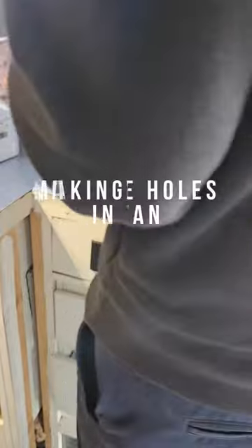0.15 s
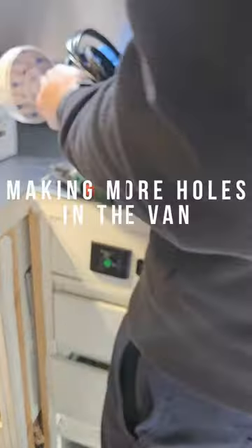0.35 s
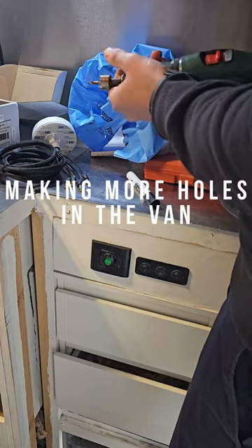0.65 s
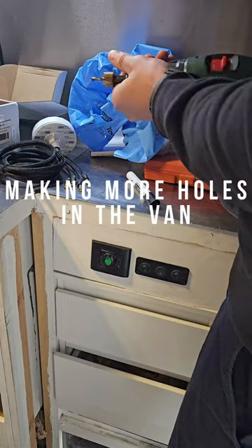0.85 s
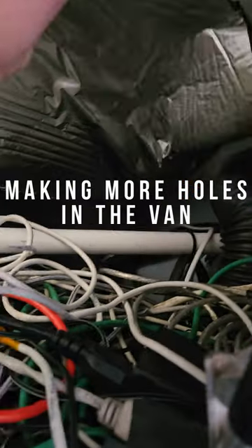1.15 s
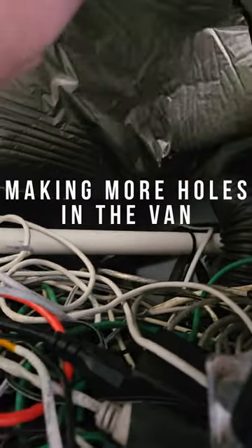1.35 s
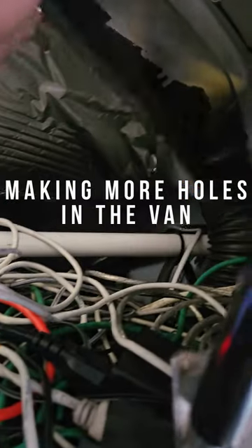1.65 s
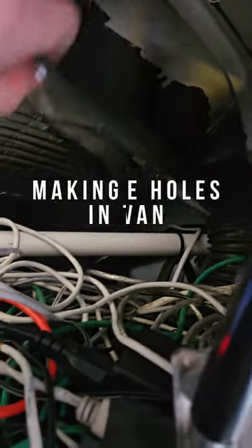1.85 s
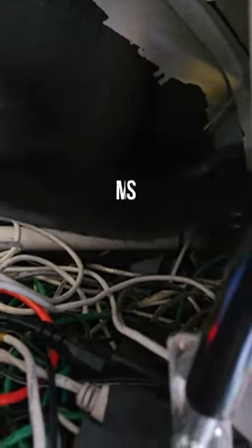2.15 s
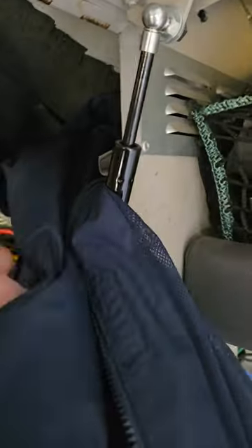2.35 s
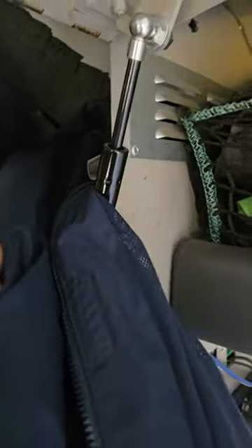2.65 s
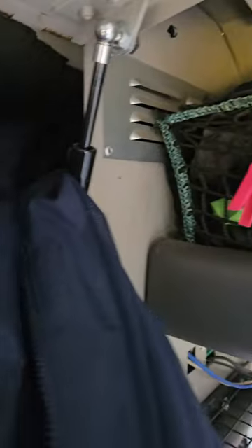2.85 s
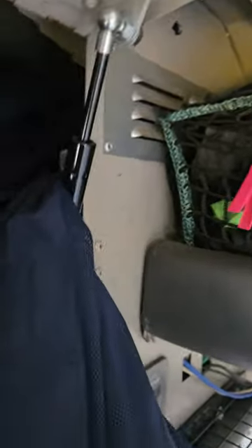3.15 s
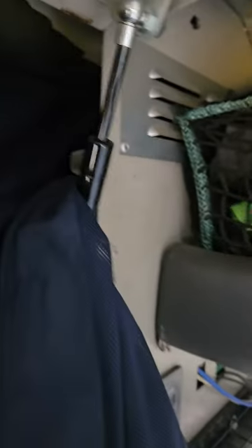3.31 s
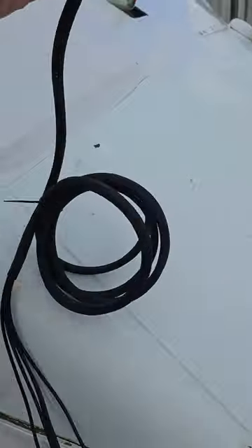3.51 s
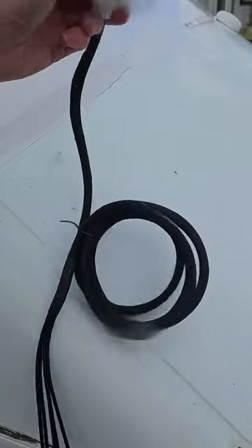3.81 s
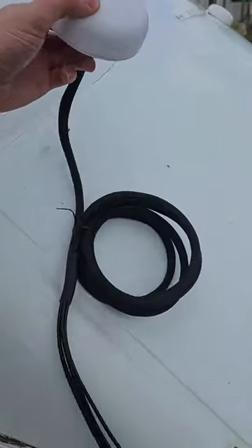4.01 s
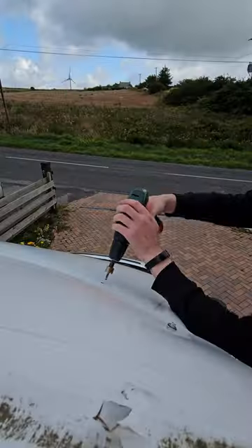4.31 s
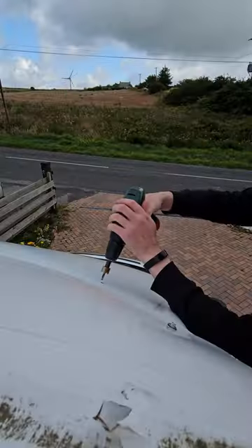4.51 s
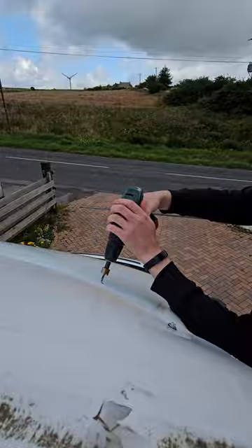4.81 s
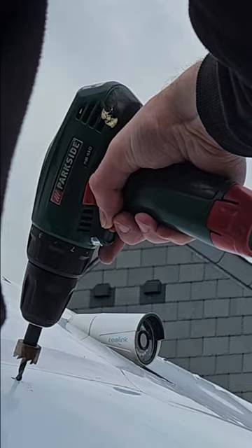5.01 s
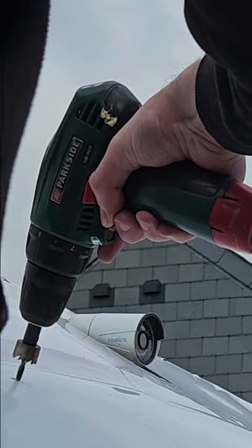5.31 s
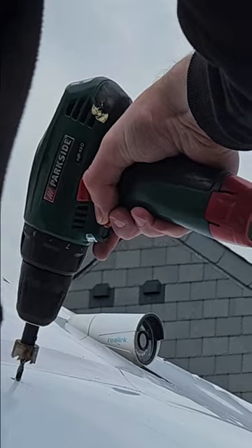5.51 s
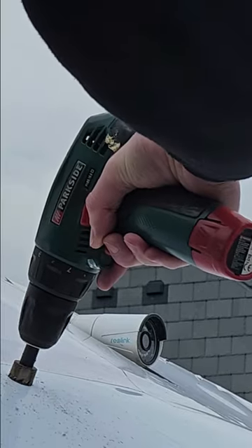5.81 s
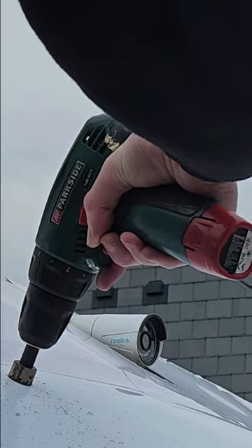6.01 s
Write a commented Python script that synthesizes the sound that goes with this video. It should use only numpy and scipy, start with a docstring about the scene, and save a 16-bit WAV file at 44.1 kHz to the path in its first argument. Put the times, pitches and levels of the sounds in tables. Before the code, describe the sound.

Close handling in a van: drill chirps, crisp plastic crunches, soft panel thumps and clicks, then a hole saw scrapes and rings a metal roof.

```python
"""Fitting a cable and drilling a van roof

Inside, motor noise, sparks and gear tones make two drill blips that close its chuck. Plastic sheeting
crackles in noise bursts, a jacket rubs past, and a cable clicks and bumps on ringing bodywork.
Outside, in light wind, the drill runs on its pilot bit until the hole saw bites into the metal roof:
grainy noise scrapes and rings the sheet. All is heard close to a hand-held phone with two ports."""
import sys
import numpy as np
from scipy import signal
from scipy.fft import rfft, irfft
from scipy.io import wavfile
from scipy.ndimage import uniform_filter1d

SR = 44100
rng = np.random.default_rng(int(sys.argv[2]) if len(sys.argv) > 2 else 0)


def wrap_up_sound(samples):
    """Save the sound to the file named by the first command line argument, as 16-bit audio."""
    columns = np.atleast_2d(samples).T
    # keep every value between -1 and 1, then stretch to whole-number steps
    tamed = np.clip(columns, -1, 1)
    steps = np.round(tamed * 32767).astype(np.int16)
    wavfile.write(sys.argv[1], SR, steps)


N = 271656
TIME = np.arange(N) / SR  # [s]

# Drill trigger presses (press [s], held [s], free shaft speed [Hz], braking [Hz per s],
# hum [dB] before it is scaled by speed)
TRIGGER = [(.6, .2, 270, 2200, -47), (0.905, .14, 320, 3100, -64)]
SPIN_UP_S = .055
BLIP_DB, BLIP_SPEED_POWER = -32, 1.8  # level at RUN_HZ; amplitude grows as this power of speed
RUN_FROM_S, RUN_HZ, RUN_DB = 5.03, 276.4, -47.5
# Gear tones of the blips (multiple of shaft speed, level [dB])
BLIP_GEARS = [(13, -6), (14, -10), (16, -15)]
# Motor whine on the roof (multiple of shaft speed, level [dB])
RUN_WHINE = [(2, -17), (18, -13), (21, -11), (27, -14), (29, -11), (31, -12), (49, -16)]
# Colour of the brush hiss and of the sparks (frequency [Hz], relative level [dB])
BRUSH_TONE = [(150, -21), (650, 0.5), (1400, -5), (3800, 0.5), (8000, -4), (16000, -14)]
SPARK_TONE = [(400, -10), (3000, -17), (5400, -5), (6600, -18), (8200, -6)]
# The housing booms when an overtone of the shaft sweeps through its resonance
HOUSING_HZ, HOUSING_WIDTH_HZ, HOUSING_DB = 570, 170, -47
# Gear case resonances, rung by chattering teeth (frequency [Hz], width [Hz], level [dB])
GEAR_CASE = [(1060, 3400, -1.5), (3220, 340, -2), (5300, 620, 0.5), (8200, 1400, -6.5)]
CHUCK_TURNS_PER_S, RATTLE_DB = 17, -46.5  # turns at RUN_HZ

# The saw bites: its load grows over LOAD_S and slows the shaft by SAG_HZ
BITE_S, LOAD_S, SAG_HZ = 5.652, 0.049, 22.44
SCRAPE_DB, SWARF_DB, SHAKE_DB = -34, -33, -24.5
EASE_DB_PER_S = 13.5  # swarf and shaking ease as the groove is cut
# Ringing of the roof and saw cup (frequency [Hz], width [Hz], level [dB])
SHEET_RINGS = [(1235, 27, -2.5), (2050, 110, -2.5), (2770, 150, 1.5), (3390, 130, 9), (3800, 480, 7),
               (6130, 130, 0.5)]
# Colour of the scrape and of the torn swarf (frequency [Hz], relative level [dB])
SCRAPE_TONE = [(450, 6), (900, 0), (3600, -6.5), (9000, -12.5), (16000, -7)]
SWARF_TONE = [(5000, -20), (11000, -20), (14400, 2)]

# Squeezes of plastic sheeting (full at [s], attack [s], hold [s], level [dB])
SQUEEZES = [(1.17, 0.036, 0.048, -42.5), (1.38, 0.089, 0.024, -25), (1.5, 0.1, 0.022, -33),
            (1.86, 0.47, 0.12, -23), (2.06, 0.23, 0.073, -21), (2.21, 0.099, 0.083, -26.5)]
SQUEEZE_RELEASE_S = 0.06
# Short crunches: handled drill first, then plastic sheeting and fabric (time [s], level [dB])
CRUNCHES = [(0.422, -33), (0.459, -39), (1.239, -20.5), (1.374, -16), (1.459, -25.5), (1.501, -26),
            (1.543, -23.5), (1.624, -33.5), (1.778, -22.5), (1.798, -23), (1.823, -15.5), (1.882, -17.5),
            (1.906, -19), (1.944, -18), (1.962, -19), (2.002, -15), (2.043, -19), (2.055, -16.5),
            (2.07, -14.5), (2.096, -17.5), (2.201, -19.5), (2.229, -17), (2.254, -18), (2.31, -13),
            (2.948, -27), (3.115, -24.5), (3.163, -29.5)]
CRUNCH_T60_S, CRACK_T60_S, CRACK_DB = .04, 0.014, -4  # T60: time to fall by 60 dB
# Each crunch rings at its own pitch, scattered about a centre
RING_HZ, RING_SPREAD_OCTAVES, RING_Q, RING_DB = 3800, .9, 3.5, 4
# Colour of the crackles and crunches (frequency [Hz], relative level [dB])
PLASTIC_TONE = [(60, -6.5), (160, 4.5), (550, 6.5), (1250, 1.5), (1480, 6), (2350, 1.5), (4700, 5.5),
                (6500, -0.5), (16000, -3.5)]

# Cable and hard plastic clicks (time [s], body level [dB], treble relative to body [dB] before a
# common treble boost)
CLICKS = [(1.875, -15.5, 2.5), (3.54, -38, 3), (3.576, -43, 16), (3.624, -28.5, 2.5), (3.641, -48, 21.5),
          (3.75, -34, -19), (3.985, -18.5, -3), (3.998, -29, -20), (4.092, -47, 4.5)]
# Colour of a click's body and of its treble (frequency [Hz], relative level [dB])
SNAP_TONE = [(300, -19), (2150, 1), (3400, 4.5), (8000, -2), (16000, -18)]
SNAP_TREBLE_TONE = [(4000, -14.5), (11500, 3)]
# Bumps on the van's panels (time [s], level [dB], centre pitch [Hz])
BUMPS = [(1.241, -19.5, 235), (1.374, -17, 226), (1.424, -19.5, 197), (1.436, -19, 187),
         (1.453, -19.5, 141), (1.548, -18.5, 134), (1.965, -17.5, 164), (2.096, -15, 138),
         (2.914, -12.5, 110), (2.946, -16.5, 142), (3.005, -22, 150), (3.152, -18.5, 138),
         (4.83, -23.5, 75), (3.792, -21, 236), (3.852, -20.5, 125)]
# Panel ringing (multiple of centre pitch, level [dB], time to fall 60 dB [s])
PANEL_MODES = [(.62, -8, .14), (1, -1, .075), (1.5, -4, .05)]
# Knocks of chuck, cable and fittings (time [s], level [dB], ring [Hz], time to fall 60 dB [s])
KNOCKS = [(.581, -38.5, 748, 0.05), (0.804, -30.5, 711, 0.05), (1.242, -23, 564, 0.024),
          (1.379, -23, 596, .06), (1.549, -24.5, 870, 0.027), (1.967, -20.5, 840, 0.059),
          (2.071, -13.5, 557, 0.028), (2.098, -19, 520, 0.032), (2.857, -23, 475, 0.0095),
          (2.918, -22.5, 305, 0.081), (3.003, -26.5, 710, 0.1), (3.424, -31, 730, 0.1),
          (3.79, -27, 605, .016), (3.869, -31.5, 380, 0.027), (4.242, -42.5, 3400, 0.034),
          (4.899, -40.5, 2440, 0.03)]
# Ringing of a knocked fitting (multiple of ring pitch, level [dB])
FITTING_MODES = [(1, 0), (1.6, -13), (2.9, -12.5)]
SCUFF_DB, SCUFF_T60_S = -3, 0.03

# Jacket slides (full at [s], hold [s], swish [dB], dull rub [dB]), both before the closeness boost
SLIDES = [(2.304, 1.119, -49.5, -43.5), (3.515, 0.78, -69, -51)]
SLIDE_ATTACK_S, SLIDE_RELEASE_S = 0.2, 0.46
# The jacket comes close to the phone once, then draws away
CLOSEST_S, APPROACH_S, RECEDE_S = 2.919, 0.26, 0.38
CLOSE_SWISH_DB, CLOSE_RUB_DB = 19.5, 13.5
# Brushes of a sleeve near the phone (full at [s], hold [s], level [dB])
BRUSHES = [(0, 0.093, -46.5), (0.046, 0.0047, -30), (0.114, 0.01, -29)]
BRUSH_ATTACK_S, BRUSH_RELEASE_S = 0.021, 0.088
# Colour of the cloth's swish and of its rub (frequency [Hz], relative level [dB])
SWISH_TONE = [(400, -3.5), (1500, -7), (16000, -7.5)]
RUB_TONE = [(50, 4), (170, 9.5), (450, 1.5), (800, 0), (2000, -10), (6000, -57.5)]

# Buffets of handling and wind on the ports (full at [s], hold [s], level [dB])
BUFFETS = [(2.922, 0.19, -42), (4.553, 0.026, -38), (4.842, 0.027, -36.5)]
BUFFET_ATTACK_S, BUFFET_RELEASE_S = 0.28, 0.14
RUMBLE_FROM_S, RUMBLE_BUILD_S, RUMBLE_DB = 1.14, 0.3, -40
RUSH_UNTIL_S, RUSH_DB = .42, -36.5
# Colour of the rumble (and roof shake), the low rush and the air (frequency [Hz], relative level [dB])
RUMBLE_TONE = [(20, -12), (60, 7), (120, -3), (230, -17.5), (800, -65)]
RUSH_TONE = [(60, -1), (130, -11.5), (240, -0.5), (420, -16), (760, -8.5), (1100, -12.5), (1350, -26.5),
             (5000, -43.5)]
AIR_TONE = [(25, 3.5), (700, -2.5), (3000, -18), (8000, -17), (16000, -48)]

# Level of the left-right difference, relative to the shared sound (frequency [Hz], level [dB])
STEREO_WIDTH = [(300, -11), (1300, 0.5), (4000, 0.5)]
# Colour of each microphone port (frequency [Hz], level [dB])
LEFT_PORT = [(250, 1), (6000, -.5), (8200, 5.5), (9600, -8.5), (13000, -1)]
RIGHT_PORT = [(5500, -0.5), (7500, -2), (9500, -12), (12500, 1)]
TOP_HZ = 15900


def drill():
    """Two blips with the chuck in the hand, louder as they spin faster; then the run, a little left."""
    in_hand = undb(BLIP_DB) * (shaft_speed() / RUN_HZ) ** BLIP_SPEED_POWER * (TIME < RUN_FROM_S)
    on_roof = onset(RUN_FROM_S, rise_s=0.00027)
    blips = motor(BLIP_GEARS, spark_db=-10, gear_db=0, rough=.004, flutter_db=3)
    run = motor(RUN_WHINE, spark_db=-3, gear_db=3, rough=.0015, flutter_db=2.5)
    indoors = van(blips * in_hand + hum(), wet_db=-15, t60=0.31)
    lean_left = undb(np.array([[2.], [-2.]]))
    return indoors + (undb(RUN_DB) * run + rattle()) * on_roof * lean_left


def motor(tones, spark_db, gear_db, rough, flutter_db):
    """Brushes hiss and spark once a turn, and the gears sing on multiples of the shaft speed."""
    hz = shaft_speed() * (1 + rough * walk(40))
    turns = np.cumsum(hz) / SR
    gears = sum(undb(db) * np.sin(2 * np.pi * round(k) * turns) for k, db in tones)
    # the whine stands out only near full speed
    gears = gears * (hz / RUN_HZ) ** 2
    samples_from_spark = (turns % 1 - .5) * SR / hz
    sparks = np.sinc(samples_from_spark) * np.exp(-(samples_from_spark / 10) ** 2)
    # spark strength varies at random
    sparks = sparks * undb(4 * walk(300))
    # the housing smears each spark, differently towards each port
    housing = noise()[:, :512] * np.exp(-TIME[:512] / 0.018)
    smeared = signal.oaconvolve(sparks[None], housing, axes=1)[:, :N]
    buzz = unit(colour(smeared, SPARK_TONE))
    hiss = colour(noise(), BRUSH_TONE)
    return hiss + undb(spark_db) * buzz + undb(gear_db) * gears * undb(flutter_db * walk(60))


def hum():
    """The unbalanced rotor hums in each blip, and its overtones glide through the housing's resonance."""
    speed = shaft_speed() * (TIME < RUN_FROM_S)
    angle = 2 * np.pi * np.cumsum(speed) / SR
    presses = [(s, SPIN_UP_S, 2 * held_s, db) for s, held_s, _, _, db in TRIGGER]
    wobble = gestures(presses, SPIN_UP_S) * (speed / RUN_HZ) ** 2
    overtones = np.sin(2 * angle) + np.sin(3 * angle) / 2
    boom = resonance(overtones, HOUSING_HZ, HOUSING_WIDTH_HZ)
    return wobble * np.sin(angle) + undb(HOUSING_DB) * boom * np.sqrt(speed / RUN_HZ)


def rattle():
    """Gear teeth chatter unevenly in the case, hardest once in each turn of the chuck."""
    chatter = grains(rate=2400, spread_db=2, grain_s=0.0011) * chuck_swing()
    return undb(RATTLE_DB) * ringing(chatter, GEAR_CASE)


def shaft_speed():
    """Turns per second: spins up on a press, brakes on release, and sags under the saw on the roof."""
    blips = 0
    for s, held_s, hz, braking, _ in TRIGGER:
        slowing = braking * np.maximum(TIME - s - held_s, 0)
        blips = blips + np.maximum(hz * onset(s, SPIN_UP_S) - slowing, 0)
    run = RUN_HZ * (TIME > RUN_FROM_S) - SAG_HZ * onset(BITE_S, LOAD_S)
    return np.maximum(blips + run, 1)


def chuck_swing():
    """Gain of the load, which peaks once in each turn of the chuck."""
    chuck_turns = np.cumsum(shaft_speed()) / SR * CHUCK_TURNS_PER_S / RUN_HZ
    return undb(2 * np.sin(2 * np.pi * chuck_turns))


def hole_saw():
    """Teeth scrape the roof and ring sheet and cup; swarf tears off in spurts, and the roof shakes."""
    teeth = grains(rate=5000, spread_db=1.5, grain_s=0.0014)
    teeth = unit(teeth * chuck_swing())
    scrape = colour(teeth, SCRAPE_TONE) + undb(-4.5) * ringing(teeth, SHEET_RINGS)
    spurts = noise() * unit(undb(6.0 * walk(110)))
    # both ports share part of the first port's spurts
    swarf = colour(0.93 * spurts + 0.61 * spurts[:1], SWARF_TONE)
    shake = colour(noise(), RUMBLE_TONE)
    contact = onset(BITE_S, rise_s=0.0043)
    easing = undb(-EASE_DB_PER_S * np.maximum(TIME - BITE_S, 0))
    lean_left = undb(np.array([[2.5], [-2.]]))
    fading = undb(SWARF_DB) * swarf * onset(BITE_S, LOAD_S) + undb(SHAKE_DB) * shake * contact
    return undb(SCRAPE_DB) * scrape * contact * lean_left + fading * easing


def crumple():
    """Sheeting buckles in tiny creases; each larger crunch cracks, then settles."""
    out = grains(rate=900, spread_db=4.5, grain_s=0.0013) * gestures(SQUEEZES, SQUEEZE_RELEASE_S)
    grit = grains(rate=3900, spread_db=-0.5, grain_s=.0008)
    age = TIME[:SR // 10]
    for s, db in CRUNCHES:
        start = int(s * SR)
        crunch = unit(grit[:, start:start + len(age)])
        crunch = crunch * undb(-60 * age / CRUNCH_T60_S) * (1 - np.exp(-age / 0.00099))
        crack = rng.standard_normal(crunch.shape) * undb(CRACK_DB - 60 * age / CRACK_T60_S)
        burst = crunch + crack
        hz = RING_HZ * 2 ** (RING_SPREAD_OCTAVES * rng.uniform(-1.1, 1))
        ring = undb(RING_DB) * resonance(burst, hz, hz / RING_Q)
        add(out, s, undb(db) * (burst + ring))
    return colour(out, PLASTIC_TONE)


def clicks():
    """Hard plastic taps: a sharp crack with a short scattered tail, some much brighter than others."""
    body = strikes([(s, db) for s, db, _ in CLICKS], rise_s=0.00013, t60=0.047)
    treble = strikes([(s, db + treble_db) for s, db, treble_db in CLICKS], rise_s=0.000137, t60=0.011)
    crack = colour(noise() * treble, SNAP_TREBLE_TONE)
    return colour(noise() * body, SNAP_TONE) + undb(10.0) * crack


def bumps():
    """A soft blow rings damped panel modes, whose pitch wavers as the pressure on the panel shifts."""
    out = np.zeros(N)
    age = TIME[:SR // 4]
    for s, db, hz in BUMPS:
        start = int(s * SR)
        end = start + len(age)
        for k, (ratio, mode_db, t60) in enumerate(PANEL_MODES):
            wavering_hz = hz * ratio * (1 + .1 * walk(90)[start:end])
            cycles = np.cumsum(wavering_hz) / SR
            level = undb(db + mode_db - 60 * age / t60)
            # every other mode is flipped in sign
            out[start:end] += (-1) ** k * level * np.sin(2 * np.pi * cycles)
    return out * undb(np.array([[-1.5], [-4.5]]))


def knocks():
    """A blow rings the few modes of a fitting while the contact scuffs briefly."""
    out = np.zeros((2, N))
    age = TIME[:SR // 5]
    for s, db, hz, t60 in KNOCKS:
        ring = sum(undb(mode_db - 60 * age / t60) * np.sin(2 * np.pi * hz * ratio * age)
                   for ratio, mode_db in FITTING_MODES)
        scuff = unit(resonance(rng.standard_normal((2, len(age))), hz, hz))
        scuff = scuff * undb(SCUFF_DB - 60 * age / SCUFF_T60_S)
        add(out, s, undb(db) * (ring + scuff))
    return out


def cloth():
    """Fibres slip over each other: a fine swish above a duller rub that catches and slips."""
    swish = grains(rate=30000, spread_db=16.0, grain_s=0.0037)
    rub = colour(grains(rate=700, spread_db=4.5, grain_s=0.0043), RUB_TONE)
    sleeve = colour(swish, [(1000, -14), (4500, 8)])
    approach = np.clip(1 + (TIME - CLOSEST_S) / APPROACH_S, 0, 1)
    closeness = approach * (1 - onset(CLOSEST_S, RECEDE_S))
    swish_rows = [(s, SLIDE_ATTACK_S, hold, db) for s, hold, db, _ in SLIDES]
    rub_rows = [(s, SLIDE_ATTACK_S, hold, db) for s, hold, _, db in SLIDES]
    brush_rows = [(s, BRUSH_ATTACK_S, hold, db) for s, hold, db in BRUSHES]
    swishing = gestures(swish_rows, SLIDE_RELEASE_S) * undb(CLOSE_SWISH_DB * closeness)
    rubbing = gestures(rub_rows, SLIDE_RELEASE_S) * undb(CLOSE_RUB_DB * closeness)
    brushing = gestures(brush_rows, BRUSH_RELEASE_S)
    return colour(swish, SWISH_TONE) * swishing + rub * rubbing + sleeve * brushing


def rumble():
    """Handling, and later gusts, buffet the ports over a steady low rumble."""
    rows = [(s, BUFFET_ATTACK_S, hold, db) for s, hold, db in BUFFETS]
    buffets = gestures(rows, BUFFET_RELEASE_S)
    steady = undb(RUMBLE_DB) * onset(RUMBLE_FROM_S, RUMBLE_BUILD_S)
    return colour(noise(), RUMBLE_TONE) * undb(2 * walk(9.1)) * (steady + buffets)


def background():
    """A low rush that stops abruptly, and faint air that grows once the handling starts."""
    rush = undb(RUSH_DB) * colour(noise(), RUSH_TONE) * (1 - onset(RUSH_UNTIL_S, rise_s=0.0016))
    air = undb(-60.5) + undb(-67.5) * onset(RUMBLE_FROM_S, RUMBLE_BUILD_S)
    return rush + air * undb(walk(27)) * colour(noise(), AIR_TONE)


def van(x, wet_db, t60):
    """The cluttered van adds a short, dull tail of fading noise echoes."""
    age = TIME[:SR // 3]
    tail = noise()[:, :len(age)] * undb(-60 * age / t60) * (age > .003)
    tail /= np.sqrt(np.sum(tail ** 2, axis=1, keepdims=True))
    echoes = signal.oaconvolve(x, tail, axes=1)[:, :N]
    return x + undb(wet_db) * colour(echoes, [(1000, 3.5), (16000, -9.5)], keep_power=False)


def undb(db):
    """Turn decibels into a gain."""
    return 10 ** (np.asarray(db) / 20)


def unit(x):
    """Scale to an average strength (rms) of 1."""
    return x / np.sqrt(np.mean(x ** 2))


def noise():
    """White noise, unrelated at the two ports."""
    return rng.standard_normal((2, N))


def walk(rate):
    """Random levels, about `rate` new ones a second, joined by straight slopes; rms 1."""
    step = int(SR / rate)
    held = rng.standard_normal(N)[np.arange(N) // step]
    return unit(uniform_filter1d(held, step))


def colour(x, points, keep_power=True):
    """Filter through (Hz, dB) points without pre-echo; white noise keeps its power unless told not to."""
    size = 4096
    hz, db = np.transpose(points)
    bins_hz = np.fft.rfftfreq(size, 1 / SR)
    gain = undb(np.interp(np.log(bins_hz + 1), np.log(hz), db))
    # fold the cepstrum so that the filter responds only after its input
    cepstrum = irfft(np.log(unit(gain) if keep_power else gain))
    cepstrum[1:size // 2] *= 2
    cepstrum[size // 2 + 1:] = 0
    response = irfft(np.exp(rfft(cepstrum)))
    return signal.oaconvolve(np.atleast_2d(x), response[None], axes=1)[:, :N]


def resonance(x, hz, width_hz):
    """Let through a band around one pitch, with gain 1 at its centre."""
    return signal.lfilter(*signal.iirpeak(hz, hz / width_hz, fs=SR), x)


def ringing(x, modes):
    """Sum of (Hz, width Hz, dB) resonances, each swelling and fading as the contact shifts; rms 1."""
    return unit(sum(undb(db + 2 * walk(14)) * unit(resonance(x, hz, width)) for hz, width, db in modes))


def grains(rate, spread_db, grain_s):
    """Tiny fading noise bursts at random moments and of random strength; rms 1."""
    starts = rng.random(N) < rate / SR
    strength = undb(spread_db * np.minimum(rng.exponential(size=N), 4))
    energy = signal.lfilter([1], [1, -np.exp(-1 / (grain_s * SR))], starts * strength ** 2)
    return unit(noise() * np.sqrt(energy))


def strikes(rows, rise_s, t60):
    """Summed envelopes of (s, dB) blows: a quick rise, then an exponential fall."""
    out = np.zeros(N)
    for s, db in rows:
        start = int(s * SR)
        age = TIME[:min(SR // 4, N - start)]
        out[start:start + len(age)] += undb(db - 60 * age / t60) * (1 - np.exp(-age / rise_s))
    return out


def gestures(rows, release_s):
    """Summed envelopes of (full at s, attack s, hold s, dB) moves; attack and release span 60 dB."""
    out = 0
    for s, attack_s, hold_s, db in rows:
        away = np.maximum((s - TIME) / attack_s, (TIME - s - hold_s) / release_s).clip(0)
        out = out + undb(db - 60 * away)
    return out


def onset(start_s, rise_s):
    """Zero until the start, then settles at 1."""
    return 1 - np.exp(-np.maximum(TIME - start_s, 0) / rise_s)


def add(out, s, x):
    """Mix a short sound into out from time s."""
    start = int(s * SR)
    out[:, start:start + x.shape[-1]] += x


def scene():
    """All sources at the two ports."""
    handling = van(clicks() + crumple() + bumps() + knocks(), wet_db=-12, t60=.16)
    return drill() + hole_saw() + handling + cloth() + rumble() + background()


def record(dry):
    """Close-set ports share the bass, each colours the treble in its own way, and the top is cut."""
    mid = (dry[0] + dry[1]) / 2
    side = colour((dry[0] - dry[1]) / 2, STEREO_WIDTH, keep_power=False)
    left = colour(mid + side, LEFT_PORT, keep_power=False)
    right = colour(mid - side, RIGHT_PORT, keep_power=False)
    top_cut = signal.ellip(10, .2, 80, TOP_HZ, fs=SR, output="sos")
    return signal.sosfilt(top_cut, np.vstack([left, right]))


dry = scene()
out = record(dry)
wrap_up_sound(out)
```